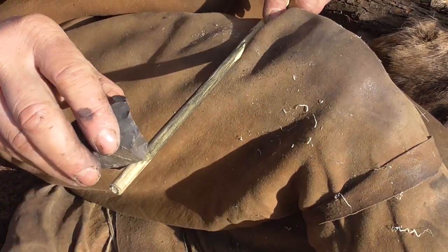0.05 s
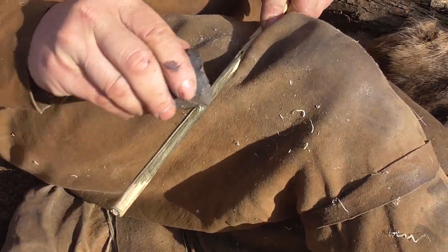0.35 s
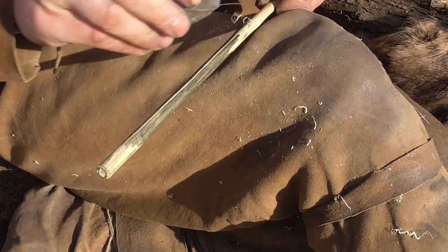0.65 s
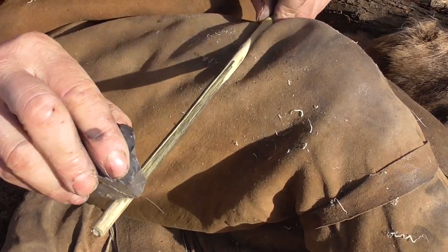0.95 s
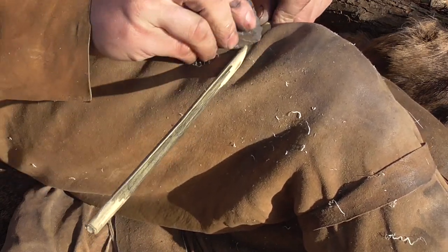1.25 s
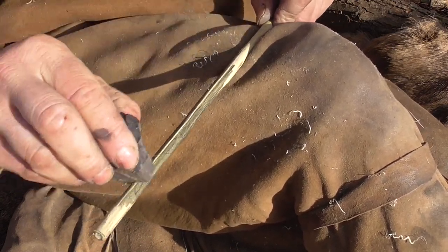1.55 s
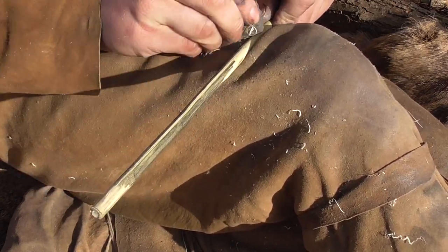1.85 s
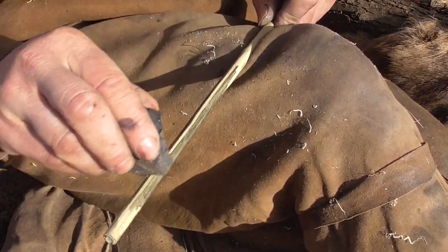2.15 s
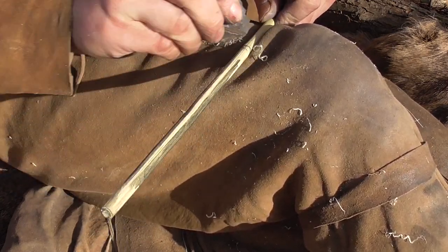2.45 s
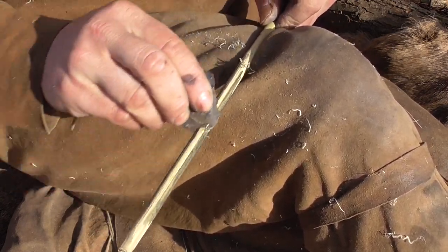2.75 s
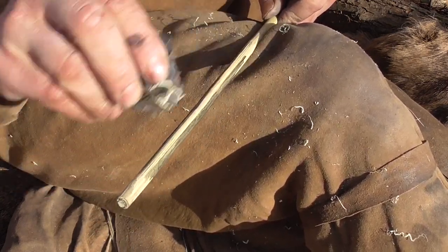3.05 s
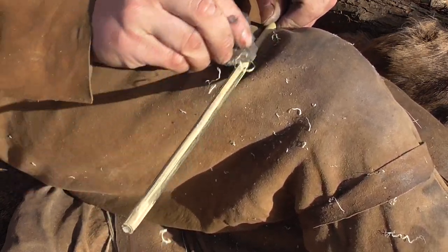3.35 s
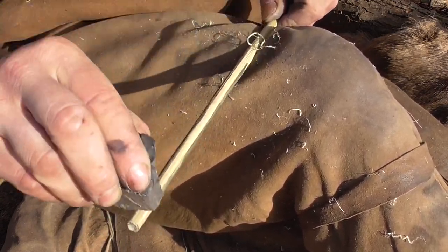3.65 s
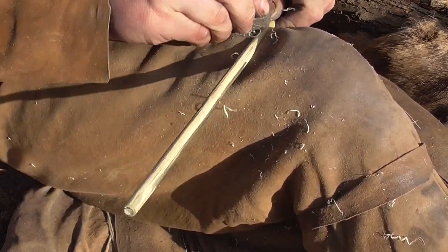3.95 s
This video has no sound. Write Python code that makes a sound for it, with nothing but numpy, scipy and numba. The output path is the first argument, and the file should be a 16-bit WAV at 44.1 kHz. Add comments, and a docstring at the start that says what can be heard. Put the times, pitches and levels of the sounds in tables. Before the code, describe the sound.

Close by and outdoors, a stone edge shaves a wooden shaft in about two hissing, raspy strokes a second. The stone lands with a small tap between strokes, and a sleeve faintly brushes leather.

```python
"""Stone flake scraping wood

A stone flake scrapes a wooden shaft on a leather-covered knee, close by and outdoors, in seven strokes.
The flake is set down with a tap, speeds up, bites into the fibres, then drags to a stop.
Tiny fractures ring the wood, whose resonances fall as the edge travels.
Behind it lie quiet air, a sleeve brushing the leather and a faint buzz."""
import sys
import numpy as np
from scipy import signal
from scipy.fft import rfft, irfft
from scipy.io import wavfile
from numba import njit

SR = 44100
rng = np.random.default_rng(int(sys.argv[2]) if len(sys.argv) > 2 else 0)


def dump_mix(stems):
    """Bounce the given channels to the path in sys.argv[1] as a 16-bit WAV at rate SR."""
    frames = np.atleast_2d(stems).T  # one column per channel
    limited = np.clip(frames, -1, 1)  # hard clip at full scale
    pcm = np.round(limited * 32767).astype(np.int16)
    wavfile.write(sys.argv[1], SR, pcm)


N = 176400
TOP_HZ = 15300


def undb(db):
    """Decibels to gain."""
    return 10 ** (np.asarray(db) / 20)


def unit(x):
    """Scale to rms 1."""
    return x / np.sqrt(np.mean(x ** 2))


def gains(points):
    """Gain at each spectral line, from (Hz, dB) points."""
    hz, db = np.array(points).T
    line_hz = np.arange(N // 2 + 1) * SR / N
    return undb(np.interp(np.log(line_hz + 1), np.log(hz), db))


def colour(x, points):
    """Minimum-phase filter through (Hz, dB) points, scaled to unit power gain."""
    cepstrum = irfft(np.log(unit(gains(points))), N)
    cepstrum[1:N // 2] *= 2
    cepstrum[N // 2 + 1:] = 0
    response = irfft(np.exp(rfft(cepstrum)), N)[:N // 40]
    return signal.oaconvolve(x, np.array(response, ndmin=x.ndim), axes=-1)[..., :N]


def walk(per_s):
    """Smooth random wander with a spread near 1."""
    return np.interp(np.arange(N) * per_s / SR, np.arange(N), rng.standard_normal(N))


def bursts(t, rows):
    """Bell-shaped swells of level."""
    return sum(undb(db) * np.exp(-.5 * ((t - at) / half_s) ** 2) for at, half_s, db in rows)


# Outdoor air spectrum. Each row: frequency in Hz, relative level in dB.
AIR_SPECTRUM = [(15, -16), (25, -49.5), (55, -4), (164, -1.5), (193, -6.5), (253, -1), (349, -10.5),
                (1300, -15.5), (1660, -20), (1800, -24), (2010, -22), (2360, -21.5), (2920, -25.5),
                (14300, -26), (15500, -38)]
def air(level_db=-59):
    """Quiet outdoor air: low noise whose level wanders slightly."""
    return undb(level_db + walk(6.84)) * colour(rng.standard_normal(N), AIR_SPECTRUM)


# Buzz tones. Each row: pitch in Hz, relative level in dB, T60 in seconds.
BUZZ_TONES = [(2354, 4, 0.015), (2680, 2, 0.012)]
# Buzz spans. Each row: start and end in seconds.
BUZZ_SPANS = [(0, 2.25), (2.57, 2.67)]
def buzz(t, pips_per_s=59.94, level_db=-70.5):
    """A faint train of sharp pips, even in time and uneven in strength, on two close pitches."""
    age = (t - .0072) % (1 / pips_per_s)
    tones = sum(undb(db - 60 * age / t60) * np.sin(2 * np.pi * hz * age) for hz, db, t60 in BUZZ_TONES)
    attack = np.minimum(age / .0008, 1)
    strength = np.clip(1 + .5 * walk(pips_per_s), .5, 2)
    gate = sum(np.clip(np.minimum(t - on, off - t) / .021, 0, 1) for on, off in BUZZ_SPANS)
    return undb(level_db) * unit(tones * attack * strength) * gate


# Sleeve brushes. Each row: centre in seconds, half length in seconds, level in dB.
SLEEVE_BRUSHES = [(0.707, 0.17, -59), (1.426, 0.054, -67.5), (3.084, 0.041, -63)]
# Rustle spectrum. Each row: frequency in Hz, relative level in dB.
SLEEVE_SPECTRUM = [(200, 7), (800, 4.5), (2000, -3.5), (4500, -1), (7000, -8.5), (11000, -1), (15500, -18)]
def sleeve(t):
    """The sleeve brushes the leather as the hand comes back."""
    return colour(bursts(t, SLEEVE_BRUSHES) * rng.standard_normal(N), SLEEVE_SPECTRUM)


# Flake landings. Each row: start in seconds, relative level in dB, knock centre in Hz, knock, treble # and bass
# boosts in dB, the second knock's delay in seconds and its relative level in dB.
LANDINGS = [(0.9421, -13, 1210, 11.5, -6, 9, 0.001, -8.5), (1.5672, -3, 650, 4, 4, 6, 0.0012, -4.5),
            (2.137, -9, 1290, 7, -8, 5, 0.00085, 2.5), (2.6657, -5.5, 780, 4.5, -8, 3, 0.0014, -7.5),
            (3.1911, -5, 1600, 0.5, -1, -9, 0.000714, 3.5), (3.7025, -5, 1700, 0, 6.5, -11, 0.0014, -9)]
# Shaft modes. Each row: frequency in Hz, relative level in dB, T60 in seconds.
SHAFT_MODES = [(253, -27.5, 0.023), (414, -18, 0.034), (585, -16.5, 0.012), (782, -12.5, 0.032),
               (1234, -14.5, 0.03), (1440, -10.5, 0.019), (1790, -7.5, 0.011), (2530, -8.5, 0.0046),
               (3220, -6, 0.011), (3630, -2, 0.0078), (3930, -0.5, 0.018), (4100, -2.5, 0.0054),
               (4660, 2.5, 0.0049), (5470, -11.5, 0.002), (8940, -20.5, 0.017)]
# Contact crack spectrum. Each row: frequency in Hz, relative level in dB.
CRACK_SPECTRUM = [(100, -12), (400, -10.5), (1600, -4), (2300, -6), (3900, -2), (5200, -8.5), (6500, -17.5),
                  (10000, -23.5), (15500, -43)]
def taps(t, level_db=-21.5, crack_t60_s=.0084, tail_t60_s=.047, low_cut_hz=190):
    """Each landing knocks twice in quick succession; where the flake lands decides which low mode knocks most."""
    rings, crack_level = np.zeros(N), np.zeros(N)
    for at, db, knock_hz, knock_db, treble_db, bass_db, gap_s, second_db in LANDINGS:
        near = (t > at) & (t < at + .1)
        age = t[near] - at
        crack_decay = undb(-2 - 60 * age / crack_t60_s) + undb(-12 - 60 * age / tail_t60_s)
        crack_level[near] += undb(db + treble_db / 2) * crack_decay
        for delay_s, contact_db in ((0, 0), (gap_s, second_db)):
            since = np.maximum(age - delay_s, 0)
            for k, (hz, mode_db, t60) in enumerate(SHAFT_MODES):
                place_db = knock_db * np.exp(-(np.log(hz / knock_hz) / .37) ** 2)
                place_db += treble_db * (hz > 2300) + bass_db * (hz < 680)
                level = undb(db + contact_db + mode_db + place_db - 60 * since / t60)
                detuned_hz = hz * (1 + .0063 * rng.standard_normal())
                rings[near] += (-1) ** k * level * np.sin(2 * np.pi * detuned_hz * since)
    crack = colour(crack_level * rng.standard_normal(N), CRACK_SPECTRUM)
    low_cut = signal.butter(2, low_cut_hz, "high", fs=SR, output="sos")
    return undb(level_db) * signal.sosfilt(low_cut, rings + crack)


@njit
def resonate(x, centre_hz, width_hz):
    """State-variable band-pass whose centre moves."""
    out, band_state, low_state = np.empty(len(x)), 0., 0.
    for i in range(len(x)):
        tuning, damping = np.tan(np.pi * centre_hz[i] / SR), width_hz / centre_hz[i]
        band = (band_state + tuning * (x[i] - low_state)) / (1 + tuning * (tuning + damping))
        band_state = 2 * band - band_state
        low_state += 2 * tuning * band
        out[i] = damping * band
    return out


# Shaft resonances. Each row: centre in seconds, half length in seconds, pitch at the centre in Hz,
# fall in octaves per second, level in dB.
SHAFT_GLIDES = [(0.333, 0.022, 4700, .5, -49), (0.491, 0.014, 3500, 9.9, -44), (0.532, 0.025, 4200, 8, -45),
                (1.122, 0.018, 3870, 0.79, -46), (1.245, 0.021, 3370, 11.4, -43.5),
                (1.279, 0.023, 4470, 7.2, -39), (1.77, 0.02, 4520, 1.5, -43.5),
                (1.852, 0.036, 4270, 5.8, -44.5), (2.313, 0.01, 4480, 1, -32.5),
                (2.396, 0.039, 4310, 2.7, -43), (2.86, 0.011, 4300, 12, -39), (2.919, 0.02, 4180, 7.7, -42),
                (3.35, 0.011, 4570, 4.5, -36.5), (3.382, 0.018, 5750, 3.9, -37),
                (3.428, 0.018, 4190, 8.3, -36.5), (3.877, 0.0073, 4550, 2, -39),
                (3.95, 0.03, 4030, 5.8, -39)]
def singing_shaft(t, width_hz=480.):
    """Narrow resonances fall as the edge travels along the shaft."""
    out = np.zeros(N)
    waver = 1 + .012 * walk(60)
    for at, half_s, hz, fall, db in SHAFT_GLIDES:
        near = slice(max(int((at - .12) * SR), 0), int((at + .12) * SR))
        centre_hz = np.clip(hz * waver[near] * 2 ** (fall * (at - t[near])), 500, 12000)
        ring = rng.standard_normal(N)[near]
        for _ in range(2):
            ring = resonate(ring, centre_hz, width_hz)
        out[near] += unit(ring) * bursts(t[near], [(at, half_s, db)])
    return out


# Stone flake modes. Each row: frequency in Hz, width in Hz, gain in dB.
FLAKE_MODES = [(5490, 74, -1), (6770, 38, -12), (7750, 100, -23), (8070, 130, -11), (9560, 190, -1.5),
               (10930, 57, -18), (11770, 73, -18), (12800, 120, -17)]
def ringing_flake(scrape):
    """The stone adds its own narrow, high resonances to the scrape."""
    hz = np.arange(N // 2 + 1) * SR / N
    modes = sum(undb(db) / (1 + 2j * (hz - centre) / width) for centre, width, db in FLAKE_MODES)
    return irfft(rfft(scrape) * (1 + modes), N)


@njit
def falling_rings(starts, hz, sizes, phase_turns, t60_s, fall_oct_per_s):
    """Sum of decaying sines that glide down."""
    out = np.zeros(N)
    for k in range(len(starts)):
        step_rad = 2 * np.pi * hz[k] / SR
        phasor = sizes[k] * np.exp(2j * np.pi * phase_turns[k])
        pole = np.exp(1j * step_rad - np.log(1000) / (t60_s * SR))
        glide = np.exp(-1j * step_rad * fall_oct_per_s * np.log(2) / SR)
        for i in range(starts[k], min(N, starts[k] + int(.7 * t60_s * SR))):
            phasor *= pole
            pole *= glide
            out[i] += phasor.imag
    return out


def fibre_catches(per_s=70, decay_s=.0015):
    """Single fibres catch on the edge and snap: brief pulses between 0 and 1."""
    kicks = (rng.random(N) < per_s / SR) * rng.uniform(.67, 1, N)
    return np.minimum(signal.lfilter([1], [1, -np.exp(-1 / (decay_s * SR))], kicks), 1)


def fractures(snaps_per_s=12000, chirps_per_s=2600, catch_db=5, flutter_db=.57):
    """Snaps and chirps of tearing fibres over smooth rubbing, with gritty catches and a fluttering grip."""
    snaps = (rng.random(N) < snaps_per_s / SR) * rng.choice([-1, 1], N)
    snaps = snaps * undb(3.5 * np.minimum(rng.exponential(size=N), 4))
    count = int(chirps_per_s * N / SR)
    starts, hz = rng.integers(N, size=count), rng.uniform(0, TOP_HZ, count)
    sizes = undb(2 * np.minimum(rng.exponential(size=count), 3))
    chirps = falling_rings(starts, hz, sizes, rng.random(count), t60_s=.081, fall_oct_per_s=2.85)
    rubbing = .5 * rng.standard_normal(N)
    grip_db = catch_db * fibre_catches() + flutter_db * walk(150)
    return unit((unit(snaps) + undb(2) * unit(chirps) + rubbing) * undb(grip_db))


# Strokes. Each row: start, fastest moment and length in seconds, hiss and wood body levels in dB,
# hiss sag after the fastest moment in dB per second.
EDGE_STROKES = [(0.239, 0.449, 0.38, -41.5, -46.5, 48), (1.042, 1.2, 0.33, -40, -44.5, 40),
                (1.602, 1.744, 0.347, -37.5, -44.5, 50.5), (2.173, 2.323, 0.32, -34.5, -44, 88),
                (2.714, 2.82, 0.289, -32, -43, 76), (3.221, 3.347, 0.31, -33, -43, 76),
                (3.738, 3.862, 0.31, -32.5, -43, 69)]
# Bites tear a shaving; drags judder over the wood, mostly as the edge slows.
# Each row: centre in seconds, half length in seconds, level in dB.
EDGE_BITES = [(0.427, 0.0026, -41), (0.448, 0.005, -42), (1.731, 0.0034, -33.5), (1.798, 0.0045, -38.5),
              (1.838, 0.002, -41), (2.303, 0.0045, -25.5), (2.318, 0.005, -33), (2.826, 0.005, -25),
              (3.334, 0.0068, -28), (3.854, 0.0028, -24.5), (3.877, 0.0084, -34)]
EDGE_DRAGS = [(0.434, 0.012, -44.5), (0.546, 0.0044, -39.5), (0.565, 0.008, -36), (1.309, 0.016, -43.5),
              (1.893, 0.015, -37), (2.466, 0.012, -44.5), (2.963, 0.018, -41), (3.464, 0.011, -38),
              (3.492, 0.012, -41), (3.978, 0.013, -33)]
# Scrape layer spectra. Each row: frequency in Hz, relative level in dB.
HISS_SPECTRUM = [(1500, -44.5), (2500, -17), (3200, -1.5), (4300, 3), (5600, 0), (7000, -1.5), (7900, 1),
                 (8600, -6.5), (9400, -2), (10200, -4), (11200, 1), (13000, -6), (15500, -14.5)]
BODY_SPECTRUM = [(80, -30), (250, -5), (500, -8.5), (850, -.5), (1050, -4.5), (1300, 1), (1900, -10.5),
                 (2500, -10.5), (5000, -24.5)]
BITE_SPECTRUM = [(200, -22.5), (1200, -3), (2200, -12.5), (4000, -20), (6000, 5), (7200, 3), (8500, -10),
                 (9600, 1), (12000, -3.5), (15500, -18)]
DRAG_SPECTRUM = [(150, -22.5), (450, -11.5), (800, -8), (1400, -1.5), (2400, -16.5), (3600, -5.5),
                 (4800, -6), (6500, -21.5), (11000, -21), (15500, -40)]
def scraping(t, touch_s=.012, release_s=.06):
    """Each stroke swells with speed, sags and lifts off; bites and drags roughen it. Mid and side."""
    hiss, body = np.zeros(N), np.zeros(N)
    for start, fastest, length, hiss_db, body_db, sag_db_per_s in EDGE_STROKES:
        speed = np.interp(t, [start, fastest], [.14, 1])
        touch = np.clip((t - start) / touch_s, 0, 1)
        release = np.sin(np.pi / 2 * np.clip((start + length - t) / release_s, 0, 1)) ** 2
        sag_db = sag_db_per_s * np.maximum(t - fastest, 0)
        hiss += touch * release * speed ** 1.434 * undb(hiss_db - sag_db)
        body += touch * release * speed * undb(body_db - .95 * sag_db)
    layers = ((hiss, HISS_SPECTRUM), (body, BODY_SPECTRUM),
              (bursts(t, EDGE_BITES), BITE_SPECTRUM), (bursts(t, EDGE_DRAGS), DRAG_SPECTRUM))
    return sum(colour(level * np.array([fractures(), fractures()]), shape) for level, shape in layers)


# Stereo width of the work and of the background. Each row: frequency in Hz, side gain in dB.
WORK_WIDTH = [(150, -6), (1000, -14), (2200, -18), (4000, -20.5), (8000, -6), (12000, -5)]
BACKGROUND_WIDTH = [(50, -15), (150, -7.5), (1000, -0.5), (8000, -3.5)]
# Balance of the work. Each row: frequency in Hz, left over right in dB.
WORK_BALANCE = [(2000, 0), (4500, 0), (8000, 0.5), (12000, -3)]
def spread(mid_side, width, balance=None):
    """Direct sound in the middle, scattered sound at the sides; returns left and right."""
    mid, side = rfft(mid_side[0]), rfft(mid_side[1]) * gains(width)
    lean = 1 if balance is None else np.sqrt(gains(balance))
    return np.array([irfft((mid + side) * lean, N), irfft((mid - side) / lean, N)])


def scene():
    """Scrapes and taps close by, over the quiet surroundings."""
    t = np.arange(N) / SR
    background = np.array([air() + sleeve(t) for _ in range(2)])
    shaft = np.array([taps(t) + singing_shaft(t) for _ in range(2)])
    work = shaft + ringing_flake(scraping(t))
    return spread(background, BACKGROUND_WIDTH) + buzz(t) + spread(work, WORK_WIDTH, WORK_BALANCE)


def record(dry):
    """A steep low-pass cuts the top."""
    return signal.sosfilt(signal.ellip(10, .2, 80, TOP_HZ, fs=SR, output="sos"), dry)


dry = scene()
out = record(dry)
dump_mix(out)
```